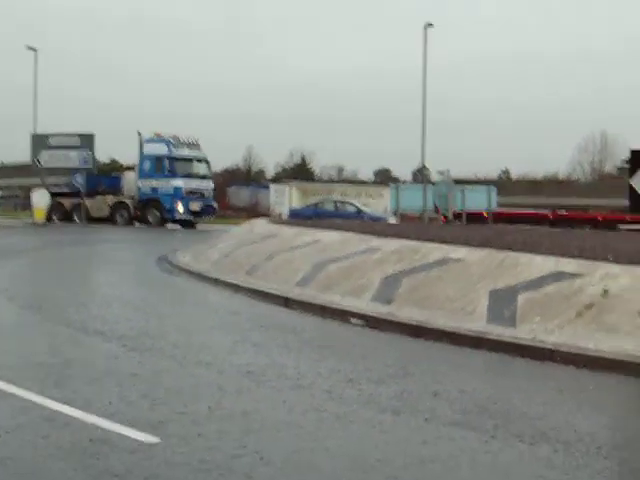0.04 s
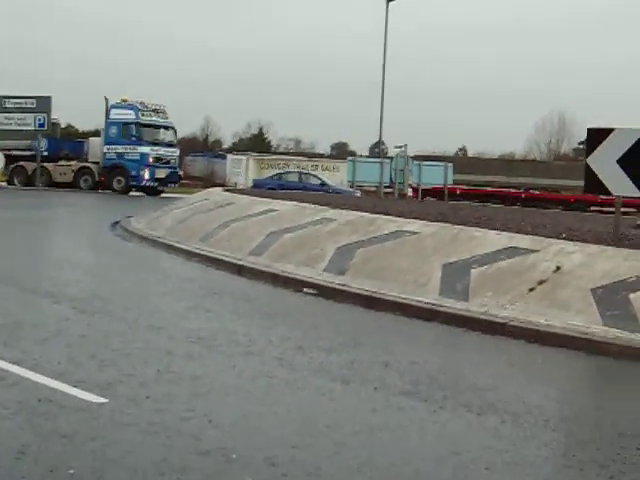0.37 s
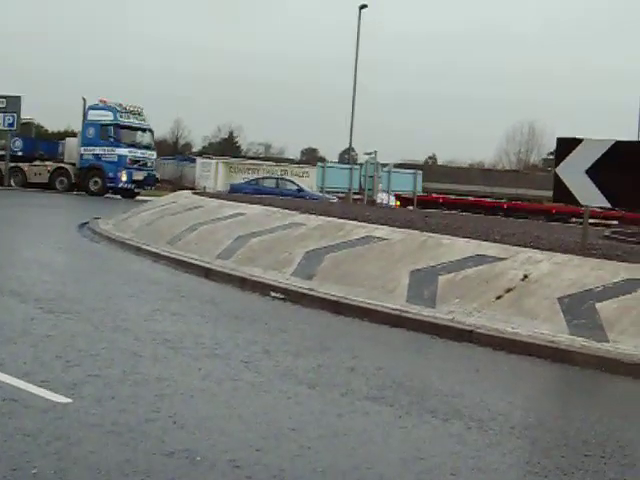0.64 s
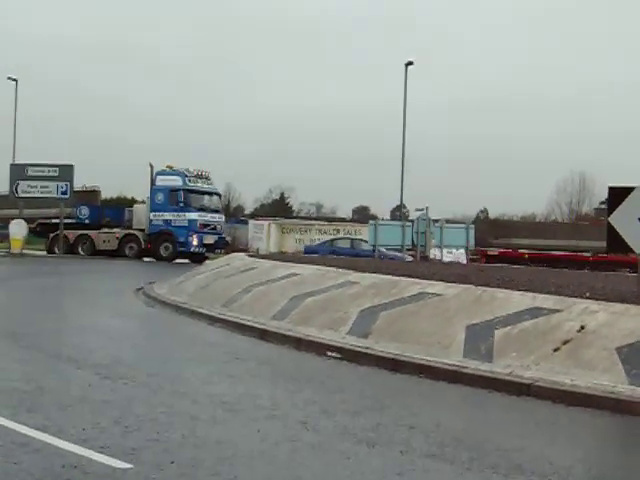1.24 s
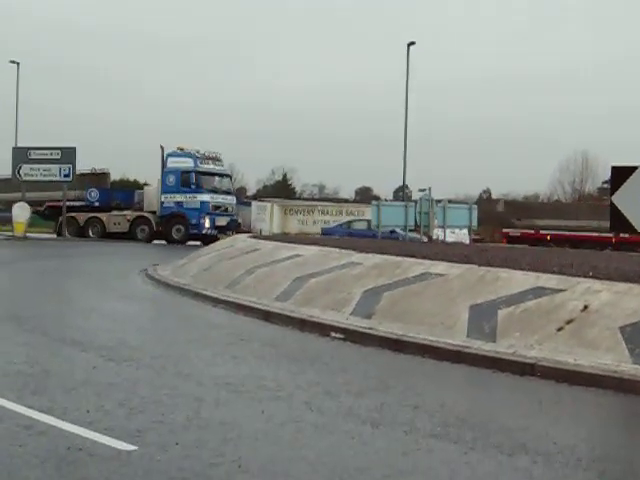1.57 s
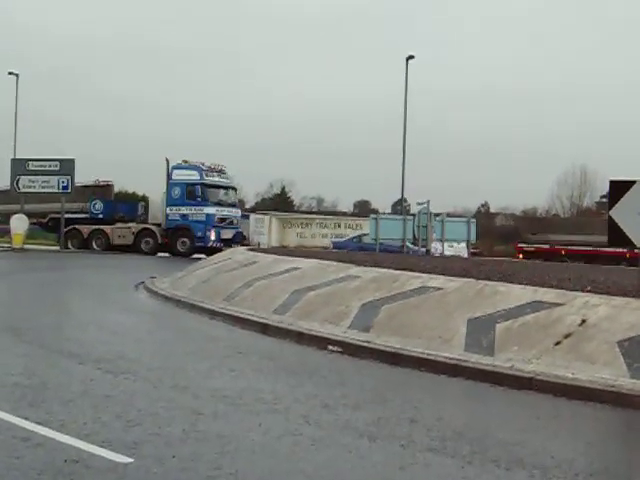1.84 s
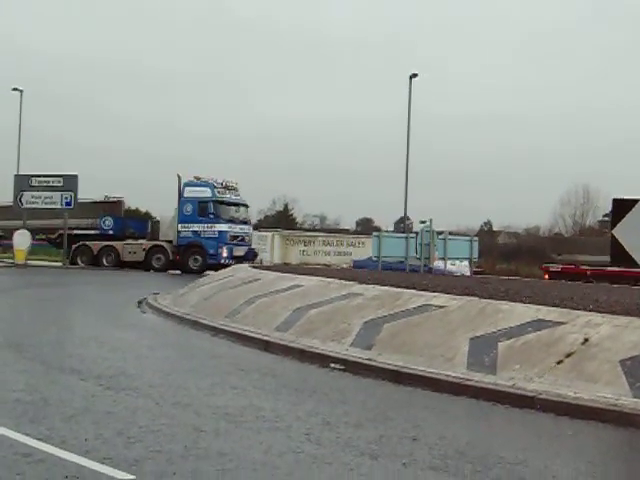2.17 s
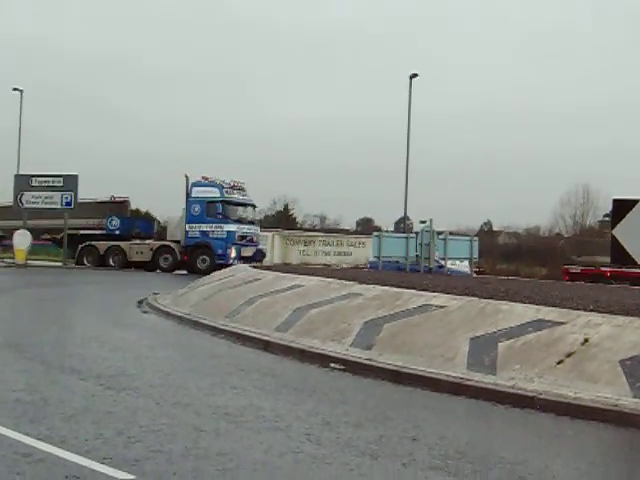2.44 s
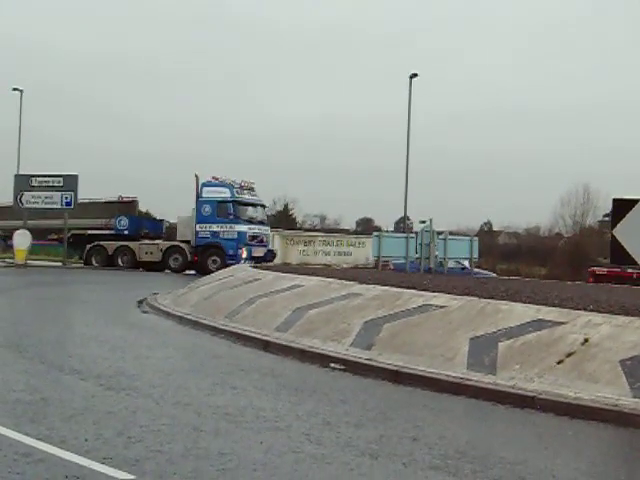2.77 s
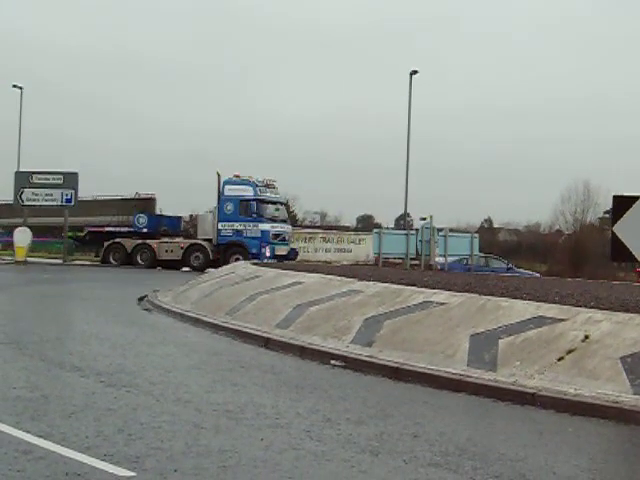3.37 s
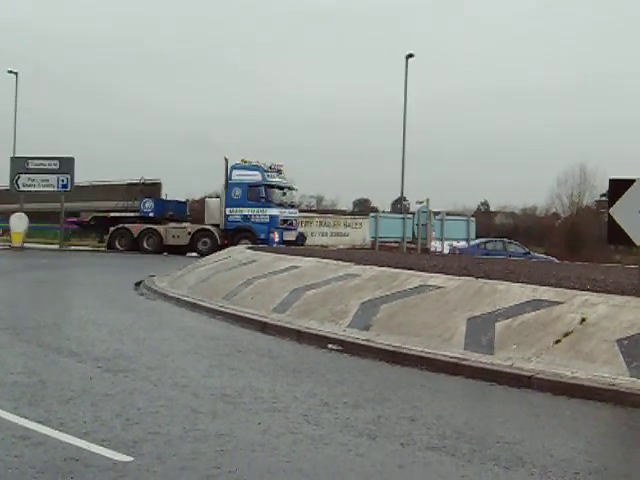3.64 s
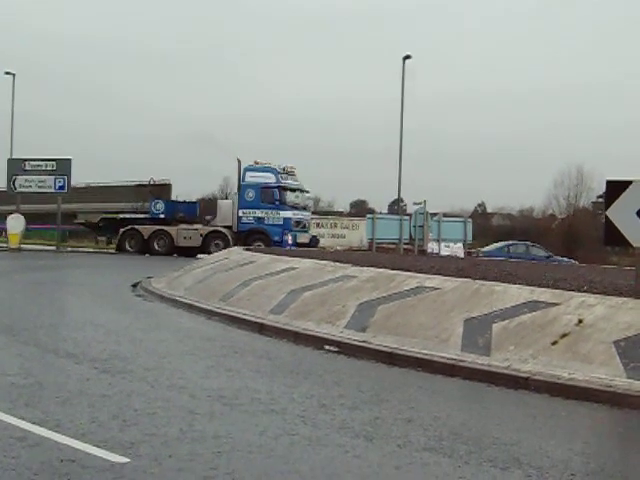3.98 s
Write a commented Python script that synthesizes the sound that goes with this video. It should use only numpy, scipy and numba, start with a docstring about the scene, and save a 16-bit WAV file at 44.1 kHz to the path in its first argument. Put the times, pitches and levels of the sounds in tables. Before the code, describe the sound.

A heavy diesel truck rumbles at a wet roundabout over the roar of tyres. Gusts and one sharp knock hit the microphone early, then the engine grows louder and rises in pitch, with light metallic clacks and clinks.

```python
"""A truck on a wet roundabout

A heavy diesel truck pulls in: each firing puffs through the exhaust and rattles the engine block,
the gears whine, the coupling clacks and the trailer clinks. Tyres roar and hiss on the wet road,
a circling car drones and a low hum runs throughout. Gusts brush the microphone, and one sharp
knock on it makes the gain control turn everything down for a moment."""
import sys
import numpy as np
from scipy import signal
from scipy.fft import rfft, irfft
from scipy.io import wavfile
from numba import njit

SR = 44100
rng = np.random.default_rng(int(sys.argv[2]) if len(sys.argv) > 2 else 0)


def wav_record(signal):
    """Record a signal, one row per channel, as 16-bit PCM in the file named by sys.argv[1]."""
    frames = np.transpose(np.atleast_2d(signal))
    bounded = np.clip(frames, -1, 1)
    # unit amplitude maps onto the largest positive 16-bit level
    quanta = np.round(bounded * 32767).astype(np.int16)
    wavfile.write(sys.argv[1], SR, quanta)


N = 176400

# how often the truck's engine fires: t/s, f/Hz
FIRING_RATE = [(0, 67.77), (.6, 62.25), (1.2, 65.27), (2.05, 65.14), (2.3, 70.35), (2.56, 74.67),
               (2.86, 70.33), (3.1, 76.98), (3.33, 82.84), (3.52, 84.76), (3.8, 94.8), (4, 100.9)]
# loudness of the exhaust: t/s, level/dB
EXHAUST_LEVEL = [(0, -28.5), (.6, -28.5), (1.1, -40), (2.1, -38.5), (2.35, -22.5), (2.6, -21.5),
                 (2.9, -26.5), (3.15, -19.5), (3.4, -23.5), (3.6, -27.5), (4, -17)]
# how the pipe and silencer shape the tone: f/Hz, level/dB
PIPE_TONE = [(60, -14.5), (80, -1), (98, -17.5), (125, 3), (150, 2), (210, -1.5), (300, -8.5), (450, -17),
             (900, -34.5)]
# loudness of the engine's clatter: t/s, level/dB
CLATTER_LEVEL = [(0, -24.5), (1, -21.5), (1.6, -19), (2, -15.5), (2.6, -15), (2.95, -18), (3.3, -18),
                 (4, -16)]
# pitches at which the engine block rings: f/Hz, width/Hz, level/dB
BLOCK_RING = [(511, 43, -3.5), (576, 60, -7), (712, 90, -1), (798, 45, 0.5), (832, 120, -1.5),
              (982, 150, -3), (1332, 165, -3.5), (1606, 270, -14.5), (2720, 335, -18)]
# tone of tyres on the wet road: f/Hz, level/dB
TYRE_TONE = [(25, -32.5), (50, -12), (70, -6), (105, -6.5), (135, 0), (175, -5), (215, -1), (350, -3.5),
             (420, -0.5), (580, 0), (850, -1.5), (1150, -8), (1400, -6), (1900, -22), (2400, -25.5),
             (3000, -25.5), (3500, -28.5), (5200, -30.5), (7000, -39)]
# loudness of the traffic's tyres: t/s, level/dB
TYRE_LEVEL = [(0, -16), (.6, -16), (1.11, -18.5), (1.35, -14), (1.48, -16.5), (2, -14), (2.55, -12.5),
              (2.95, -15), (3.5, -14.5), (4, -16)]
# notes of the hum: f/Hz, level/dB
HUM_NOTES = [(32.3, -33), (226.1, -34.5), (291, -35), (3655, -54)]
# engine note of the circling car: t/s, f/Hz, level/dB
CAR_NOTE = [(0, 89.8, -30.5), (.6, 82.6, -42), (1.4, 85, -47.5), (2, 82.9, -30), (2.35, 90.95, -29),
            (2.8, 88.8, -36), (3.5, 78.4, -38), (3.85, 74.4, -27), (4, 76.4, -42)]
# gusts over the microphone: t/s, length/s, level/dB
GUSTS = [(.005, 0.023, -28), (0.069, 0.019, -24.5), (0.189, 0.036, -28), (0.286, .11, -31.5),
         (0.503, 0.095, -29.5), (0.755, 0.21, -32), (.841, 0.015, -32.5), (0.942, 0.079, -27.5),
         (1.082, .08, -30.5)]
# tone of the gusts: f/Hz, level/dB
GUST_TONE = [(300, 3), (1200, -9), (2200, 4.5), (3200, 0.5), (4200, -5), (5200, -6.5), (7000, -12.5)]
# the knock and its bounces: t/s, level/dB
KNOCKS = [(.6638, -2.5), (.6682, -8.5), (.6825, -5)]
# ring of the microphone's housing: f/Hz, level/dB, fade time/s
HOUSING_RING = [(416, -2.5, .03), (900, -2, 0.018), (1400, 2, 0.019), (1960, -3, 0.015),
                (2590, -2.5, 0.015), (4500, -9.5, 0.0096), (8870, 17.5, 0.021)]
# blows on the coupling: t/s, level/dB
CLACKS = [(1.2285, -10.5), (1.401, -8), (1.983, -11.5)]
# ring of the coupling: f/Hz, level/dB, fade time/s
COUPLING_RING = [(1416.3, 3, 0.021), (1820, -5, .02), (2430, -7, .02), (2870, -7.5, .018),
                 (3500, -11, 0.0093)]
# blows on the trailer: t/s, level/dB
CLINKS = [(2.509, -16), (2.674, -20.5), (2.822, -18.5), (2.866, -17.5)]
# ring of the trailer's steel: f/Hz, level/dB, fade time/s
STEEL_RING = [(2696, 2, 0.045), (2785, -7.5, .08), (3270, -16, 0.042), (4920, -17, .06)]


def gain(db):
    """Turn decibels into a number to multiply by."""
    return 10 ** (np.asarray(db) / 20)


def unit(x):
    """Scale a signal to an average strength (rms) of 1."""
    return x / np.sqrt(np.mean(x ** 2))


def curve(table, column=1):
    """Join one column of a table with straight lines in time."""
    rows = np.array(table)
    return np.interp(np.arange(N) / SR, rows[:, 0], rows[:, column])


def tone_gain(table, hz):
    """Look up the gain of a tone table at any frequency."""
    rows = np.array(table)
    return gain(np.interp(np.log(hz + 1e-9), np.log(rows[:, 0]), rows[:, 1]))


def frequencies():
    """The frequency of each point in a spectrum, in Hz."""
    return np.arange(N // 2 + 1) * SR / N


def drift(rate_hz):
    """Smooth random wandering, about 1 in size."""
    return unit(irfft(rfft(rng.standard_normal(N)) * np.exp(-(frequencies() / rate_hz) ** 2), N))


def sine(hz):
    """A pure tone that follows a changing pitch."""
    return np.sin(2 * np.pi * (np.cumsum(hz) / SR + rng.random()))


def strikes(blows, notes, contact_s=0.00034):
    """Each blow rings the same notes, and each note drops 60 dB in its fade time."""
    t = np.arange(SR // 4) / SR
    ring = sum(gain(db) * np.sin(2 * np.pi * hz * t) * gain(-60 * t / fade) for hz, db, fade in notes)
    rise = 1 - np.exp(-t / contact_s)
    taps = np.zeros(N)
    for start, db in blows:
        taps[int(start * SR)] += gain(db)
    return signal.fftconvolve(taps, ring * rise)[:N]


def exhaust(firing_hz, uneven_db=-26, flutter_db=1):
    """Puffs in the pipe make notes at multiples of the firing rate; uneven cylinders add weak ones."""
    out = 0
    for thirds in range(2, 30):
        hz = thirds / 3 * firing_hz
        level_db = (uneven_db if thirds % 3 else 0) + flutter_db * drift(11)
        out += tone_gain(PIPE_TONE, hz) * gain(level_db) * sine(hz)
    return unit(out) * gain(curve(EXHAUST_LEVEL))


def clatter(firing_hz, scatter_db=2, decay_cycles=0.4, steady=0.74):
    """Each firing adds a burst to a steady rattle that makes the engine block ring."""
    cycles = np.cumsum(firing_hz) / SR
    strength = gain(scatter_db * rng.standard_normal(N // 100))[cycles.astype(int)]
    bursts = strength * np.exp(-(cycles % 1) / decay_cycles)
    rattle = (steady + bursts) * rng.standard_normal(N)
    hz = frequencies() + 1e-9
    power = 0
    for centre, width, db in BLOCK_RING:
        off_pitch = (hz ** 2 - centre ** 2) / (hz * width * np.sqrt(2))
        power += gain(db) ** 2 / (1 + off_pitch ** 2) ** 2
    return unit(irfft(rfft(rattle) * np.sqrt(power), N)) * gain(curve(CLATTER_LEVEL))


def gear_whine(hz=816, below_clatter_db=11.5, wander=0.00796):
    """The gears sing one wavering note that swells along with the clatter."""
    level_db = curve(CLATTER_LEVEL) - below_clatter_db + 1.8 * drift(14)
    return np.sqrt(2) * gain(level_db) * sine(hz * (1 + wander * drift(18)))


def tyres(bands=14, flicker_db=1.16, swell_db=1.9):
    """Tyres roar and hiss on the wet road: bands of noise flicker alone and swell together."""
    spectrum = rfft(rng.standard_normal(N)) * tone_gain(TYRE_TONE, frequencies())
    place = np.interp(np.log(frequencies() + 1), np.log([60, 6000]), [0, bands - 1])
    out = 0
    for band in range(bands):
        share = np.maximum(1 - abs(place - band), 0)
        out += irfft(spectrum * share, N) * gain(flicker_db * drift(21))
    return unit(out) * gain(curve(TYRE_LEVEL) - swell_db * drift(10))


def hum(flutter_db=1.6, wander_hz=.8):
    """Three low notes and a faint high one hum on, wavering a little."""
    notes = (gain(db + flutter_db * drift(6)) * sine(hz + wander_hz * drift(7)) for hz, db in HUM_NOTES)
    return np.sqrt(2) * sum(notes)


def car_drone():
    """The engine of a circling car drones on one low, sliding note."""
    level_db = curve(CAR_NOTE, column=2) + 1.1 * drift(9.4)
    return np.sqrt(2) * gain(level_db) * sine(curve(CAR_NOTE) + drift(24))


def gusts(rise_s=.004, fall_s=0.016):
    """Short gusts of air hiss across the microphone."""
    t = np.arange(N) / SR
    flow = 0
    for start, length, db in GUSTS:
        rise = np.clip((t - start) / rise_s, 0, 1)
        fall = np.exp(-np.maximum(t - start - length, 0) / fall_s)
        flow += gain(db) * rise * fall
    hiss = irfft(rfft(rng.standard_normal(N)) * tone_gain(GUST_TONE, frequencies()), N)
    return flow * unit(hiss) * gain(1.8 * drift(40))


def knock():
    """A knock and two quick bounces ring the microphone's housing."""
    return strikes(KNOCKS, HOUSING_RING)


def coupling_clacks():
    """Blows on the coupling between truck and trailer ring very briefly."""
    return strikes(CLACKS, COUPLING_RING)


def trailer_clinks():
    """Blows on the trailer's steel ring high and bright."""
    return strikes(CLINKS, STEEL_RING)


@njit
def follow(x, rise, fall):
    """Track the size of a signal, with one speed going up and another coming down."""
    out, level = np.empty(len(x)), 0.
    for i in range(len(x)):
        level += (x[i] - level) * (rise if x[i] > level else fall)
        out[i] = level
    return out


def gain_control(sound, limit_db=-2.5, rise_s=.0012, fall_s=0.26, lag_s=0.0017, cut_per_db=1.32):
    """Turn the sound down quickly when it passes the limit, then let it back up slowly."""
    level = follow(abs(sound[0]), 1 / (rise_s * SR), 1 / (fall_s * SR))
    excess_db = 20 * np.log10(np.maximum(level / gain(limit_db), 1))
    lag = np.exp(-1 / (lag_s * SR))
    cut_db = signal.lfilter([1 - lag], [1, -lag], cut_per_db * excess_db)
    return sound * gain(-cut_db)


def scene():
    """Truck, traffic, hum, wind and knock add up in one channel."""
    firing_hz = curve(FIRING_RATE) * (1 + 0.0027 * drift(8))  # the engine speed wobbles slightly
    engine = exhaust(firing_hz) + clatter(firing_hz) + gear_whine()
    surroundings = tyres() + gusts() + hum() + car_drone()
    return (engine + surroundings + knock() + coupling_clacks() + trailer_clinks())[None]


def record(dry, treble_hz=5730, clip_level=.7, crackle_db=-7.5, top_hz=15800):
    """After the gain control, the treble is cut and the tallest peaks are flattened, which crackles."""
    treble_cut = signal.butter(20, treble_hz, fs=SR, output="sos")
    dulled = signal.sosfiltfilt(treble_cut, gain_control(dry))
    clipped = np.clip(dulled, -clip_level, clip_level)
    body = signal.sosfiltfilt(treble_cut, clipped)
    crackle = clipped - body  # what the clipping adds above the treble cut
    top_cut = signal.ellip(8, .2, 70, top_hz, fs=SR, output="sos")
    return signal.sosfilt(top_cut, body + gain(crackle_db) * crackle)


dry = scene()
out = record(dry)
wav_record(out)
```